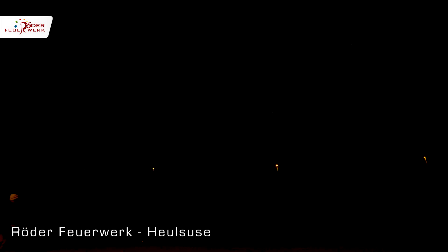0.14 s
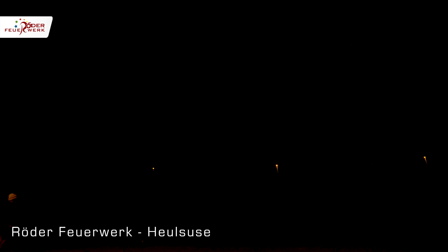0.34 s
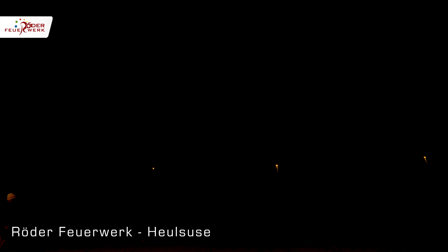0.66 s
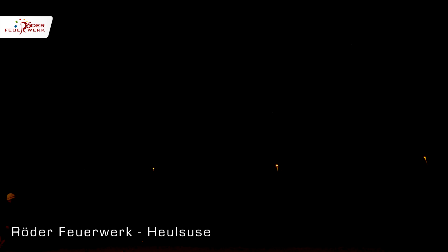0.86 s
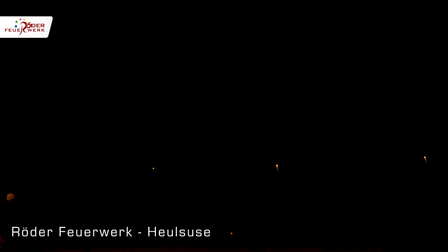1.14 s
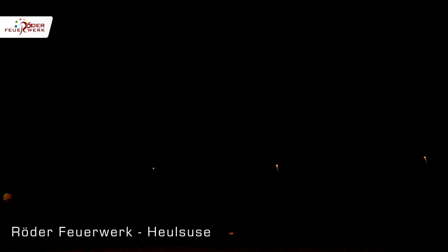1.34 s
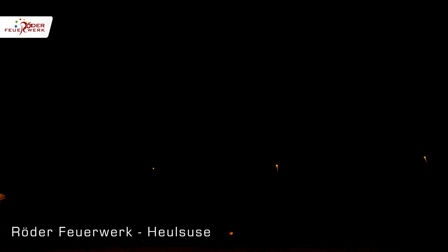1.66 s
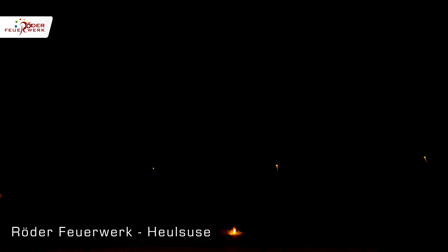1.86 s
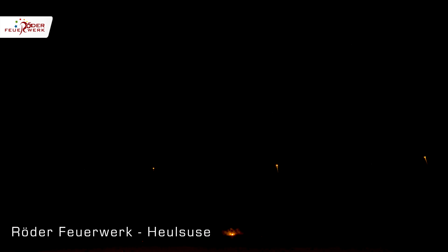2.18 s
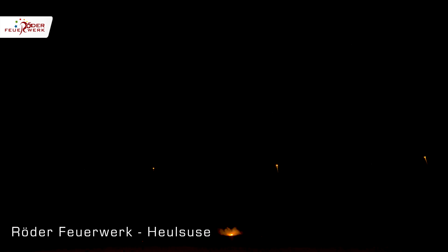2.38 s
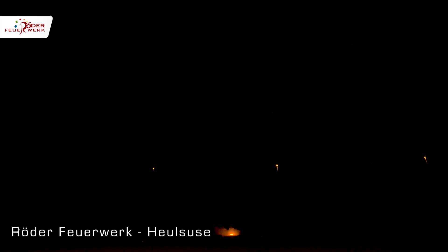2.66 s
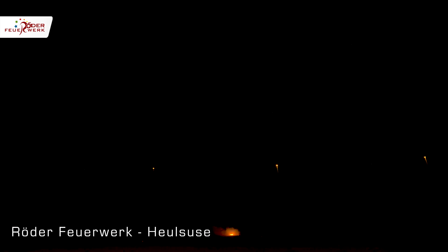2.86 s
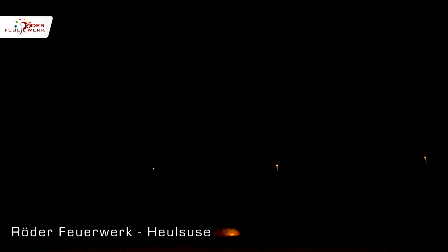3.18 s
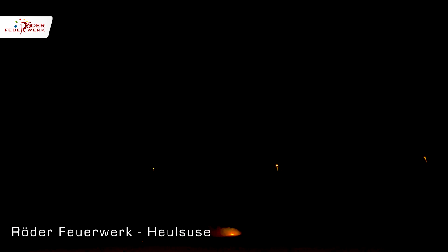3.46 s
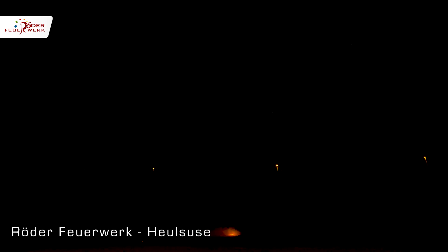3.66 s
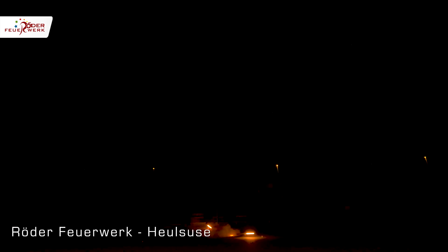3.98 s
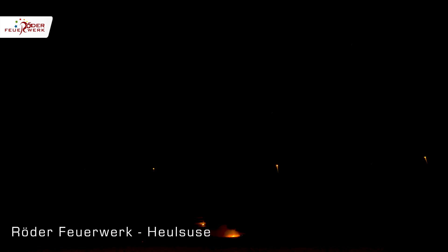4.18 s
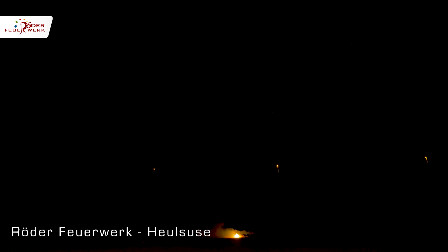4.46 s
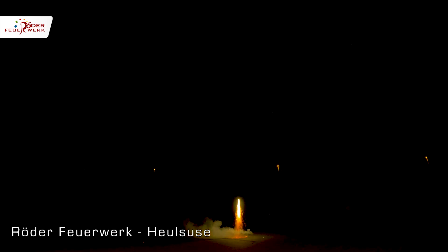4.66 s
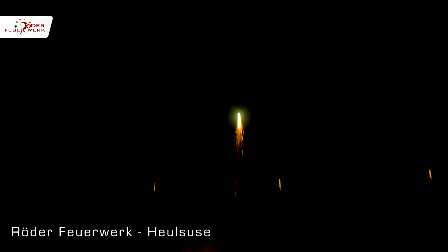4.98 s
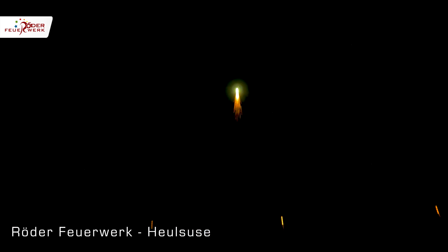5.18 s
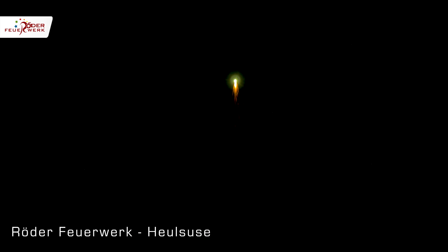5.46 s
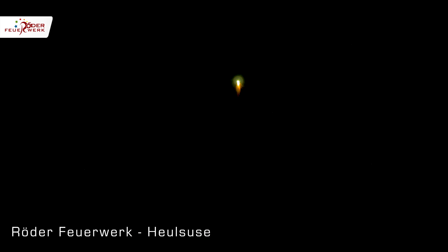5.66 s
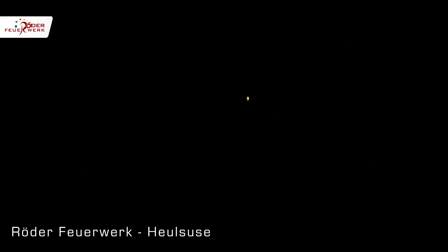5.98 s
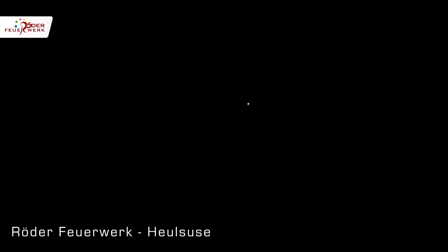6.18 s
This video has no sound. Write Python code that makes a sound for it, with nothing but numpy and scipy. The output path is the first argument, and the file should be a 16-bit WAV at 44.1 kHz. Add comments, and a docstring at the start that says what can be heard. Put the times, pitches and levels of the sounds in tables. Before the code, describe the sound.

A fuse sputters over a low rumble, then a piercing firework whistle slides downward, warbling faster and faster before a hissing jet rushes up and fades.

```python
"""Outdoors at night, a ground firework spins, whistles and lifts off over a distant rumble.
A fuse (sputtering noise) crackles and pops; then two whistling tubes light in turn and spin the body up.
Each whistle is a wandering tone with partials, sinking as its tube burns hollow and warbling as it circles.
A lifting jet (four noise bands and a delayed ground reflection) blasts the ground, climbs and fades.
Echoes and a diffuse tail surround the firework; the highest peaks are rounded and the top is cut."""
import sys
import numpy as np
from scipy import signal
from scipy.fft import rfft, irfft
from scipy.io import wavfile

SR = 44100
rng = np.random.default_rng(int(sys.argv[2]) if len(sys.argv) > 2 else 0)


def wav_out(sig):
    """Save sig, one row per channel (or a flat mono array), as 16-bit PCM at SR to the path in sys.argv[1]."""
    wavfile.write(sys.argv[1], SR, np.round(np.clip(np.atleast_2d(sig).T, -1, 1) * 32767).astype(np.int16))


N = 279020
TIME = np.arange(N) / SR
CUTOFF_HZ = 15800

# whistling tubes: (t/s, pitch f/Hz, level/dB, roughness 0-1, half-order level/dB re the whistle)
FIRST_TUBE = [(1.864, 4934, -10.5, 0.66, -37), (1.885, 5190, -16.5, 0.8, -47), (1.91, 5480, -16, 0.6, -38),
              (1.95, 5470, -14, 0.34, -28), (2.0, 5360, -13, 0.27, -20), (2.028, 5330, -11.5, 0, -29),
              (2.045, 5445, -11.5, 0.1, -24.5), (2.12, 5345, -18.5, 0.2, -13),
              (2.15, 5240, -17.5, 0.43, -11.5), (2.2, 5295, -12, 0.17, -19.5),
              (2.3, 5167, -14.5, 0.11, -30), (2.38, 5097, -15, 0.18, -20), (2.45, 4974, -6.5, 0.19, -27),
              (2.5, 4934, -21.5, 0.31, -18), (2.56, 4820, -16, 0.05, -23), (2.62, 4704, -17, 0.34, -18.5),
              (2.7, 4670, -17.5, 0.38, -24), (2.755, 4570, -20, 0.19, -28), (2.775, 4230, -15.5, 0.81, -20),
              (2.815, 4123, -32, 0.77, -13), (2.845, 4380, -18, 0.38, -21), (2.9, 4486, -16.5, 0.15, -20),
              (3.0, 4340, -18, 0.29, -22), (3.1, 4324, -20, 0.34, -16.5), (3.2, 4206, -18, 0.35, -18.5),
              (3.3, 4063, -25.5, 0.46, -7), (3.4, 3990, -23.5, 0.45, -5.5), (3.5, 3864, -17, 0.16, -14),
              (3.56, 3770, -19.5, 0.29, -19), (3.6, 3680, -15.5, 0.04, -18.5),
              (3.7, 3582, -16.5, 0.11, -18.5), (3.8, 3526, -17, 0.11, -18.5), (3.9, 3495, -16.5, 0.13, -21),
              (4.0, 3458, -16, 0.02, -18), (4.1, 3430, -15, 0.07, -20.5), (4.2, 3399, -16.5, 0, -16.5),
              (4.28, 3381, -15, 0.02, -24), (4.34, 3297, -13, 0.02, -53), (4.403, 3265, -15.5, 0, -41)]
SECOND_TUBE = [(2.465, 3817, -21, 0.95, -27), (2.48, 4367, -25, 0.76, -27), (2.5, 4620, -14, 0.91, -26),
               (2.55, 5000, -23.5, 0.79, -25), (2.58, 5250, -19.5, 0.91, -15),
               (2.66, 5430, -19.5, 0.18, -32), (2.74, 5390, -21, 0.21, -32), (2.81, 5350, -16.5, .2, -24),
               (2.9, 5310, -21, 0.19, -30), (3.0, 5077, -20.5, 0.17, -27), (3.1, 4917, -18.5, 0.28, -23),
               (3.2, 4840, -17.5, 0.21, -23), (3.3, 4715, -19.5, 0.36, -12), (3.4, 4615, -21.5, .45, -7),
               (3.5, 4590, -30, 0.511, -8), (3.6, 4493, -23, 0.33, -11.5), (3.7, 4506, -22, .2, -13.5),
               (3.8, 4344, -25, 0.29, -12), (3.88, 4250, -23.5, 0.56, -14), (3.95, 4060, -27, .5, -10),
               (4.0, 4096, -37, 0.55, -24)]
# spin of the body: (t/s, rotation rate/turns per s)
SPIN = [(2.3, 0.0), (2.5, 8.51), (2.7, 10.83), (2.9, 19.93), (3.0, 24.08), (3.2, 29.26), (3.45, 38.92),
        (3.7, 48.63), (3.88, 53.47), (4.02, 63.74), (4.15, 60.7), (4.41, 57.92)]
# gas leaving the tubes, before the trims in spinner: (t/s, rush level/dB, hiss level/dB)
EXHAUST = [(1.862, -37.5, -31), (1.9, -36.5, -24), (1.96, -54, -26), (2.03, -70, -29), (2.09, -49, -29.5),
           (2.15, -43.5, -27.5), (2.21, -54.5, -27.5), (2.3, -51, -33), (2.42, -45.5, -37),
           (2.5, -45.5, -30), (2.6, -49, -33), (2.72, -41, -27), (2.78, -39.5, -26), (2.85, -42.5, -25),
           (3.0, -38, -26.5), (3.15, -37, -34), (3.3, -36.5, -22), (3.42, -34, -26.5), (3.55, -34.5, -30),
           (3.65, -38, -35), (3.8, -38.5, -39), (3.92, -37.5, -28.5), (4.03, -45.5, -34), (4.15, -50, -34),
           (4.3, -48.5, -35), (4.4, -44, -43)]
# spectra of the gas: (f/Hz, relative level/dB per Hz)
RUSH_COLOUR = [(60, -35), (130, -18), (250, -10.5), (450, -9.5), (830, -3), (1300, -14), (1600, -5.5),
               (2050, 1), (2650, -11), (3400, 4), (4500, 0.5), (6000, -40)]
EXHAUST_HISS_COLOUR = [(2000, -31), (3000, 3.5), (4000, 7.5), (6000, -1), (8200, 1.5), (9500, -11.5),
                       (12000, -16.5), (16000, -30)]


def spinner():
    """Rotating sources: two tubes half a turn apart, and the turbulent noise of the gas they blow out."""
    turns_per_s, = in_time(SPIN)
    angle = 2 * np.pi * np.cumsum(turns_per_s) / SR
    spun_up = np.clip(turns_per_s / 60, 0, 1) ** 0.18
    burn = dict(lead=.5, jitter_hz=190, skirt_db=-6, flutter_db=3.5)
    first = whistle(FIRST_TUBE, angle, beam=.72 * spun_up, **burn)
    second = whistle(SECOND_TUBE, angle + np.pi, beam=.75 * spun_up, **burn)
    rush_db, hiss_db = in_time(EXHAUST)
    rush = from_db(rush_db + 10.5) * noise(RUSH_COLOUR, grain_db=-0.5)
    hiss = from_db(hiss_db - 0.5) * noise(EXHAUST_HISS_COLOUR, grain_db=3.0)
    # two nozzles: the gas swells twice a turn
    twice_a_turn = swing(2 * angle, 0.37 * spun_up, lead=0.99)
    gas = (rush + hiss) * twice_a_turn * burning(1.862, 4.4, 0.016)
    return first + second + gas


# overtones of a tube, before fraying and colouring: (multiple of the pitch, level/dB when not shrill)
OVERTONES = [(2, -15.5), (3, -23), (4, -39)]
# tones of strong-weak alternating cycles: (multiple of the pitch, level/dB re the half-order level)
HALF_ORDERS = [(.5, 1.5), (1.5, -0.5), (2.5, -7.5), (3.5, -1)]
# radius of the nozzle's circle; speed of sound in m/s
ARM_M, SOUND_SPEED = .038, 343


def whistle(tube, angle, beam, lead, jitter_hz, skirt_db, flutter_db):
    """Pulsating combustion: a tube sings; circling adds Doppler shift and swings its directional beam."""
    pitch, level_db, rough, half_db = in_time(tube)
    rough = np.clip(rough, 0, 1)
    cycles = np.cumsum(pitch + jitter_hz * rough * drift(295.8)) / SR
    # the circling nozzle varies its distance, here counted in wavelengths
    path_cycles = pitch * ARM_M * np.cos(angle) / SOUND_SPEED
    phase = 2 * np.pi * (cycles + path_cycles)

    # while the tube is short and shrill, its overtones are weak and all its partials frayed
    shrill = np.clip(np.log2(pitch / 3400), 0, 1)
    fray = np.clip(.15 + 1.1 * rough + .7 * shrill, 0, 1)
    upper = from_db(-19 * shrill) * partials(phase, pitch, OVERTONES, fray)
    halves = from_db(half_db) * partials(phase, pitch, HALF_ORDERS, fray)
    # the ground reflection cancels a band below the whistle; the far treble is lost
    notched = filtered(upper + halves, [2400, 2950], "bandstop", order=1)
    colour = filtered(notched, 10800, order=6)

    # uneven cycles spread a noisy skirt round the tone
    skirt = from_db(skirt_db) * rough * (drift(760) * np.sin(phase) + drift(620) * np.cos(phase))
    pure = np.sqrt(1 - .6 * rough ** 2) * np.sin(phase)
    tone = np.sqrt(2) * (pure + skirt + colour)
    flutter = from_db(flutter_db * np.sqrt(rough) * np.clip(drift(85), -2, 1))
    level = from_db(level_db) * burning(tube[0][0], tube[-1][0], 0.0034)
    return tone * flutter * swing(angle, beam, lead) * level


def partials(phase, pitch, levels, fray):
    """Harmonic series: lines at multiples of the pitch; fray (0-1) turns each into a narrow noise band."""
    along, across, out = drift(240), drift(220), 0
    for multiple, db in levels:
        order = round(2 * multiple) / 2
        sine, cosine = np.sin(order * phase), np.cos(order * phase)
        # a random shift makes the partials wander apart
        shift = rng.integers(N)
        band = (np.roll(along, shift) * sine + np.roll(across, shift) * cosine) / np.sqrt(2)
        line = np.sqrt(1 - fray ** 2) * sine + fray * band
        out = out + from_db(db) * line * (order * pitch < CUTOFF_HZ)
    return out


def swing(angle, depth, lead):
    """Directivity: a nozzle is loudest as it faces the listener, once per cycle of angle; mean power 1."""
    depth = np.clip(depth, 0, .9)
    return (1 + depth * np.cos(angle + lead)) / np.sqrt(1 + depth ** 2 / 2)


# lifting jet, before the trims and build-up in lift:
# (t/s, ground blast level/dB, rush level/dB, hiss level/dB, sparks level/dB)
LIFT = [(4.41, -27.5, -37.5, -33, -31), (4.45, -28.5, -32, -24.5, -36), (4.49, -26, -29, -25.5, -39),
        (4.54, -24.5, -24.5, -22.5, -30), (4.59, -22.5, -29, -21.5, -23.5), (4.65, -29, -27, -22, -24.5),
        (4.72, -25.5, -26.5, -21.5, -22.5), (4.8, -36.5, -30, -24.5, -22), (4.88, -31, -29.5, -22, -19.5),
        (4.97, -38, -33, -22.7, -19.5), (5.08, -42.5, -37.5, -23.5, -22), (5.2, -41, -33.4, -22, -22.5),
        (5.32, -39.5, -30.5, -21.5, -24.5), (5.43, -38.5, -31, -22.5, -28), (5.53, -42, -31, -24.5, -32.5),
        (5.63, -43, -32, -28.5, -37), (5.73, -44.5, -31.5, -33.5, -42), (5.83, -43, -36.5, -37.0, -47.5),
        (5.92, -49, -37, -48, -56), (6.0, -51, -43.5, -56, -61), (6.1, -53.5, -46.1, -63, -65.7),
        (6.2, -50, -48, -63.5, -66.5), (6.32, -52, -51, -67, -66)]
# lag of the ground reflection, growing with height: (t/s, lag/ms)
GROUND_LAG = [(4.7, 0.57), (4.85, 2.43), (5.0, 3.93), (5.15, 5.45), (5.3, 6.24), (5.55, 7.05), (5.9, 7.55),
              (6.33, 8)]
# spectra of the jet: (f/Hz, relative level/dB per Hz)
BLAST_COLOUR = [(40, -33), (70, -20.5), (110, 5.5), (220, 1), (420, 0), (900, 3.5), (1300, -10.5),
                (2500, -39)]
JET_RUSH_COLOUR = [(500, -20), (1200, -2), (1650, 1.5), (2100, -0.5), (2700, -6), (4000, -22),
                   (8000, -36.5)]
JET_HISS_COLOUR = [(2200, -10.5), (3200, -0.5), (4400, 3.5), (5500, 1.5), (6800, -6), (9000, -33)]
SPARK_COLOUR = [(5000, -15), (7000, -1.5), (8400, 1.5), (10000, -3), (12500, -9.5), (16000, -23)]


def lift():
    """Jet noise with comb filtering: the ground reflection lags more as the jet climbs, sweeping the hiss."""
    blast_db, rush_db, hiss_db, spark_db = in_time(LIFT)
    jet = from_db(blast_db + 1.3) * noise(BLAST_COLOUR, grain_db=5.5)
    jet += from_db(rush_db - 1.65) * noise(JET_RUSH_COLOUR, grain_db=3.0)
    jet += from_db(hiss_db + 0.16) * noise(JET_HISS_COLOUR, grain_db=2.0)
    jet += from_db(spark_db) * noise(SPARK_COLOUR, grain_db=1.5)
    lag_ms, = in_time(GROUND_LAG)
    # it splutters near the ground and steadies in free air
    splutter_db = .6 + 1.2 * np.exp(-lag_ms / 3)
    jet *= from_db(splutter_db * drift(60))
    reflection = from_db(-5.5) * filtered(delayed(jet, lag_ms / 1000), 7000, order=1)
    # the jet builds up as its charge catches
    catching = np.clip(.45 + (TIME - LIFT[0][0]) / .14, 0, 1) ** 1.5
    return (jet + reflection) * catching


# fuse crackles: (t/s, peak level/dB, centre f/Hz)
CRACKLES = [(.158, -35.5, 4000), (0.215, -28, 4840), (0.225, -26.5, 4400), (0.2265, -27, 6150),
            (0.27, -38, 4000), (.391, -34.5, 6570), (.491, -29.5, 5000), (0.5502, -41, 3000),
            (.763, -43, 5500), (.904, -34, 6600)]
# flare-ups of the fuse hiss: (t/s, length/s, greatest gain/dB)
FLARES = [(.1, 0.4, 5), (1.42, 0.44, 7.6)]
# spectra of the hisses: (f/Hz, relative level/dB per Hz)
FUSE_COLOUR = [(900, 2), (1150, 7), (1450, 8), (1900, 4), (2600, 0.5), (4200, -3.5), (6000, -3.5),
               (7500, -1.5), (9000, -6.5), (12000, -11.5), (16000, -24)]
PRIMER_COLOUR = [(1000, -1), (1450, -6), (2100, -4.5), (2700, -11), (3600, 2.5), (4250, -6), (5050, 4.5),
                 (6200, -5), (7100, -4), (9000, -9), (16000, -24)]
# fuse hiss between flare-ups, and the end of both hisses
FUSE_DB, FUSE_END_S = -57.5, 1.84
# the primer inside the tube swells, then holds
PRIMER_DB, PRIMER_FULL_S, PRIMER_SWELL_DB_PER_S = -55, 1.17, 30


def fuse():
    """Combustion noise: the fuse sputters and spits crackles; the primer in the tube hisses hollowly."""
    fuse_db = FUSE_DB
    for s, length_s, db in FLARES:
        fuse_db = fuse_db + db * np.sqrt(abs(np.sin(np.pi * ramp(s, length_s))))
    primer_db = PRIMER_DB - PRIMER_SWELL_DB_PER_S * np.maximum(PRIMER_FULL_S - TIME, 0)
    hiss = from_db(fuse_db) * noise(FUSE_COLOUR, grain_db=2)
    hiss += from_db(primer_db) * noise(PRIMER_COLOUR, grain_db=1.0)
    out = hiss * from_db(0.99 * drift(25)) * burning(0, FUSE_END_S, 0.069)
    age = np.arange(SR // 20) / SR
    for s, db, hz in CRACKLES:
        burst = rng.standard_normal(len(age)) * np.exp(-age / 0.0016)
        snap = filtered(burst, [hz / 1.7, hz * 1.46], "band", order=3)
        at = int(s * SR)
        out[at:at + len(age)] += from_db(db) * snap / abs(snap).max()
    return out


# pops of burning powder, before the bass cut in scene:
# (t/s, pulse peak level/dB, half-cycle length/ms, trailing puff level/dB re the peak)
POPS = [(0.116, -30, 0.9, -28), (0.492, -25.5, 1.7, -24), (.549, -30, 0.9, -15), (1.204, -38, 0.36, -8),
        (1.346, -24.5, 1.1, -17.5), (1.627, -20.5, .5, -17), (1.853, -28.5, 1.8, -2.5),
        (1.8645, -18, 0.35, -9), (2.465, -23, 0.54, 0), (3.565, -24, 3.3, -26), (3.944, -16.5, 1.04, -11),
        (3.972, -10.5, 0.52, -21), (3.974, -13, 3.74, -16)]


def pops():
    """Impulsive radiation: each pop is a fast-damped push and pull of air, with a decaying puff of gas."""
    out, age = np.zeros(N), np.arange(SR // 5) / SR
    for s, db, length_ms, puff_db in POPS:
        half_cycles = age / (length_ms / 1000)
        pulse = np.sin(np.pi * half_cycles) * np.exp(-half_cycles * 1.17)
        gas = rms_one(filtered(rng.standard_normal(len(age)), [180, 2600], "band"))
        puff = gas * np.exp(-age / 0.0094)
        at = int(s * SR)
        out[at:at + len(age)] += from_db(db) * (pulse / pulse.max() + from_db(puff_db) * puff)
    return out


# echoes from the surroundings, before dulling: (delay t/s, level/dB)
ECHOES = [(.035, -20), (.062, -22), (.092, -22), (.128, -22), (.165, -26)]


def surroundings(x):
    """Reflection and diffusion: a few dull echoes and a thin decaying tail, different at each ear."""
    echoes = sum(from_db(db) * delayed(x, s) for s, db in ECHOES)
    age = np.arange(SR) / SR
    # 60 dB down in 1.47 s, starting after 20 ms
    decay = from_db(-60 * age / 1.47) * (age > .02)
    tails = filtered(rng.standard_normal((2, SR)), 4700) * decay
    tails /= energy(tails)
    mid, side = signal.fftconvolve(x[None], tails, axes=1)[:, :N]
    return filtered(echoes, 7500) + from_db(-20.5) * mid + from_db(-37.5) * side * [[1], [-1]]


def energy(x):
    """Signal energy: the root of the summed squares of each row."""
    return np.sqrt(np.sum(x ** 2, axis=1, keepdims=True))


# distant rumble: (t/s, level/dB)
RUMBLE = [(0, -42), (0.25, -44.5), (0.45, -41), (0.53, -40), (0.6, -42), (0.67, -40.4), (0.8, -43),
          (0.97, -39.5), (1.1, -43.5), (1.26, -39.5), (1.45, -42), (1.8, -41.5), (1.93, -45), (2.03, -61.2),
          (2.15, -50.5), (2.3, -51), (2.6, -54.5), (2.8, -47), (3.1, -48.5), (3.5, -47), (3.8, -46),
          (4.1, -47), (4.35, -48), (5.2, -43.5), (5.5, -47), (5.8, -41.5), (6.1, -39), (6.32, -44.5)]
# its spectrum: (f/Hz, relative level/dB per Hz)
RUMBLE_COLOUR = [(25, -44), (45, -28), (65, -18), (100, -5.5), (145, -0.5), (195, -4.5), (250, -17),
                 (400, -20), (580, -23), (850, -20.5), (1100, -29), (1600, -59)]


def rumble():
    """Broadband background: low-frequency noise whose level rises and falls."""
    rumble_db, = in_time(RUMBLE)
    return from_db(rumble_db) * noise(RUMBLE_COLOUR)


def from_db(db):
    """Logarithmic level: decibels to amplitude gain."""
    return 10 ** (np.asarray(db) / 20)


def rms_one(x):
    """Effective value: scale to rms 1."""
    return x / np.sqrt(np.mean(x ** 2) + 1e-20)


def in_time(rows):
    """Linear interpolation: each column of a curve table at every sample."""
    s, *columns = np.transpose(rows)
    return [np.interp(TIME, s, c) for c in columns]


def since(s):
    """Elapsed time: seconds since a moment, 0 before it."""
    return np.maximum(TIME - s, 0)


def ramp(s, length_s):
    """Linear onset: rises from 0 at a moment to 1 over the given length."""
    return np.minimum(since(s) / length_s, 1)


def burning(start_s, end_s, fade_s):
    """Gating envelope: 1 from start to end, with a short ramp outside either end."""
    return np.clip(1 + np.minimum(TIME - start_s, end_s - TIME) / fade_s, 0, 1)


def filtered(x, hz, kind="low", order=2):
    """Linear filtering: a causal Butterworth filter."""
    sos = signal.butter(order, np.clip(hz, 10, .45 * SR), kind, fs=SR, output="sos")
    return signal.sosfilt(sos, x + 1e-18)


def drift(rate_hz):
    """Low-passed noise: random wander up to the given rate, rms 1; the filter's first second is dropped."""
    return rms_one(filtered(rng.standard_normal(N + SR), rate_hz)[SR:])


def noise(colour, grain_db=0):
    """Spectral shaping: noise of a given colour, rms 1; grains of uneven size make it sputter."""
    grains = from_db(grain_db * np.clip(drift(1200), -3, 3))
    white = rng.standard_normal(N) * grains
    hz, db = np.transpose(colour)
    log_hz = np.log(np.fft.rfftfreq(N, 1 / SR) + 1)
    # beyond the table the spectrum falls 25 dB per factor e in frequency
    outside = abs(log_hz - np.clip(log_hz, np.log(hz[0]), np.log(hz[-1])))
    gain = from_db(np.interp(log_hz, np.log(hz), db) - 25 * outside)
    return rms_one(irfft(rfft(white) * gain, N))


def delayed(x, lag_s):
    """Propagation delay: the sound as it was lag_s earlier."""
    return np.interp(TIME - lag_s, TIME, x, left=0)


def scene():
    """Superposition: the firework straight ahead, over a rumble that sinks while the whistles sound."""
    firework = spinner() + lift() + fuse() + filtered(pops(), 104, "high", order=4)
    front = firework + rumble()
    # bass and treble scattered from nearby reach the two ears a little differently
    scattered = delayed(front, .011)
    side = from_db(-21) * filtered(scattered, 1600)
    side += from_db(-16) * filtered(scattered, 6500, "high", order=4)
    return front + surroundings(firework) + side * [[1], [-1]]


def record(dry):
    """Saturation and band limiting: the highest peaks are rounded and the top is cut."""
    rounded = dry / (1 + (dry / .66) ** 8) ** (1 / 8)
    return signal.sosfilt(signal.ellip(10, .1, 80, CUTOFF_HZ, fs=SR, output="sos"), rounded)


dry = scene()
out = record(dry)
wav_out(out)
```